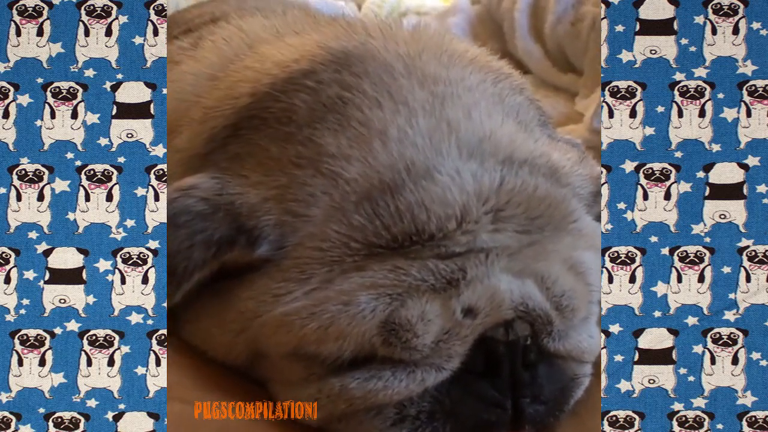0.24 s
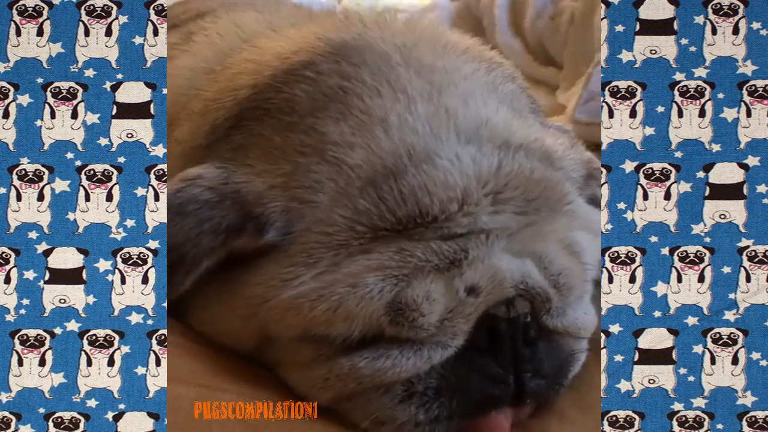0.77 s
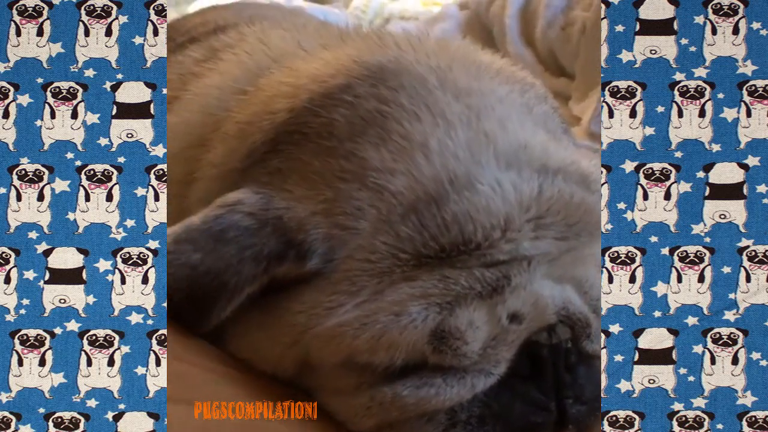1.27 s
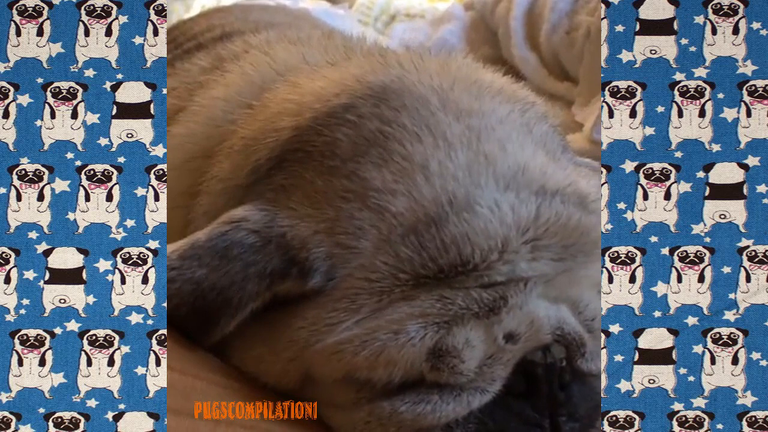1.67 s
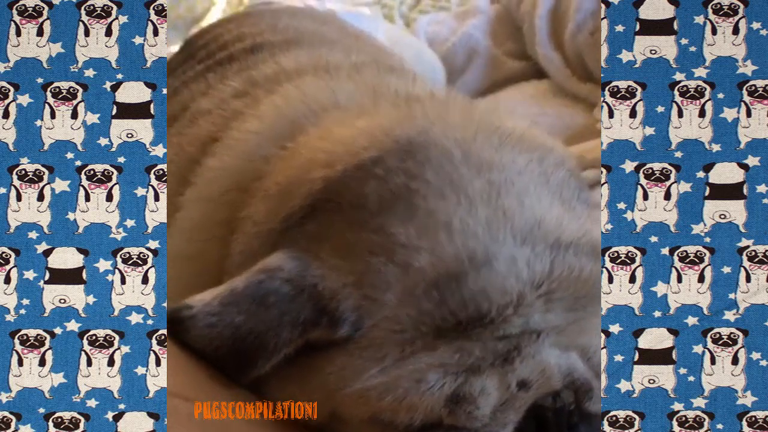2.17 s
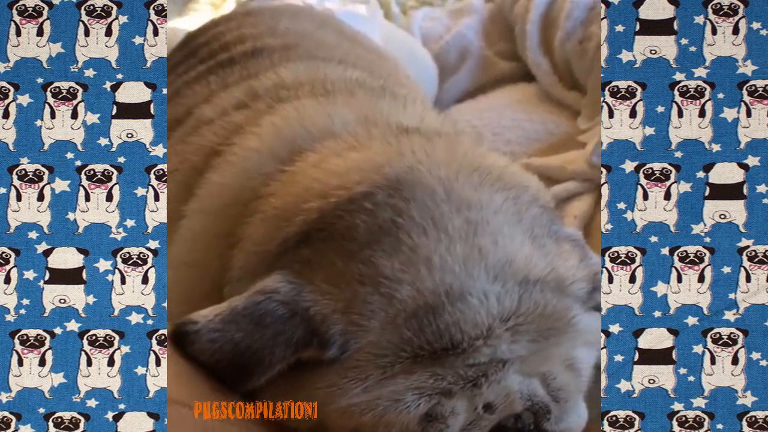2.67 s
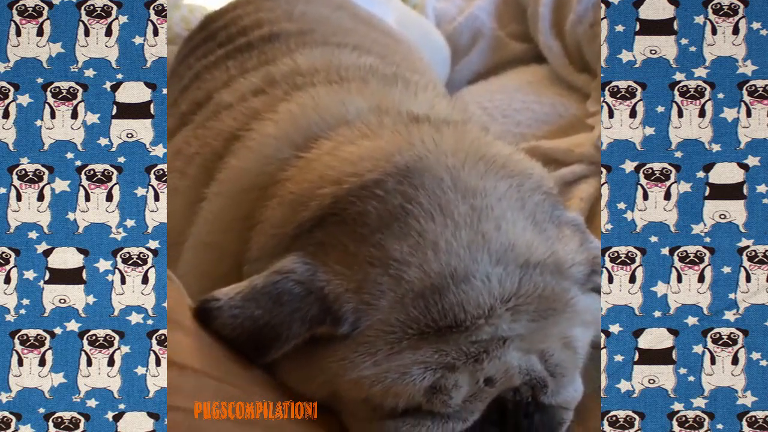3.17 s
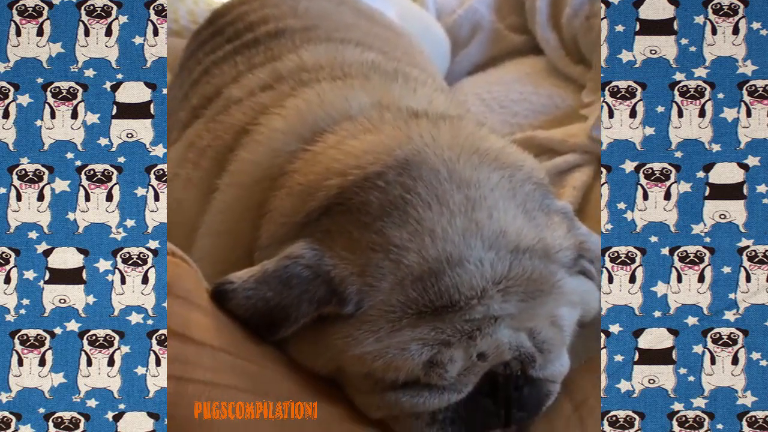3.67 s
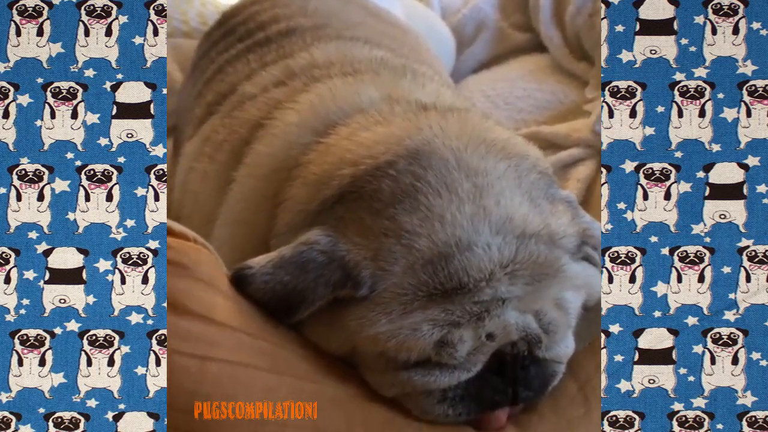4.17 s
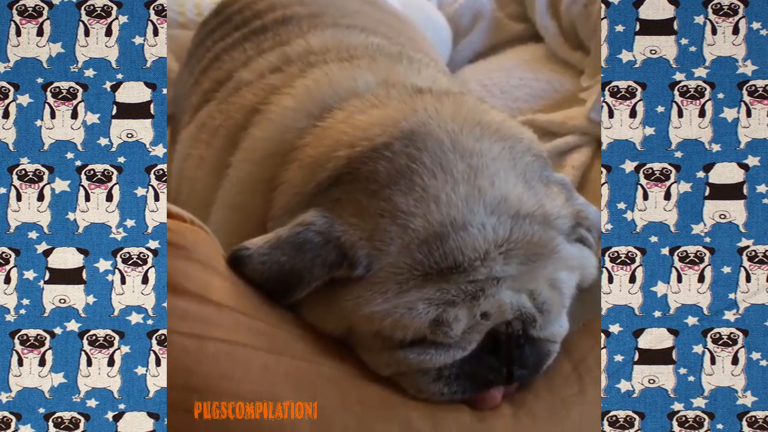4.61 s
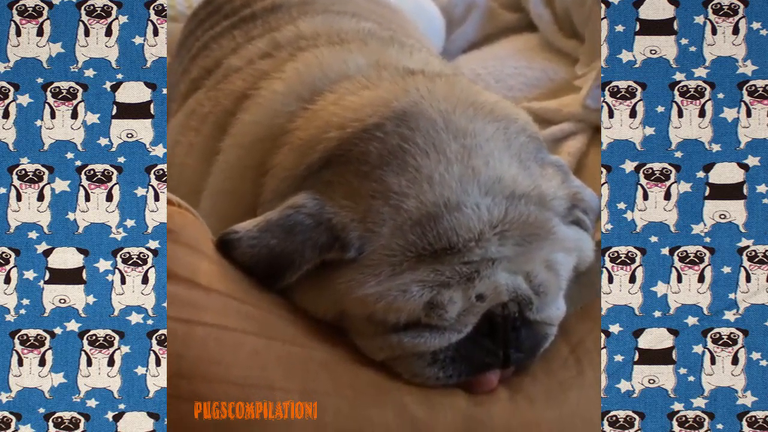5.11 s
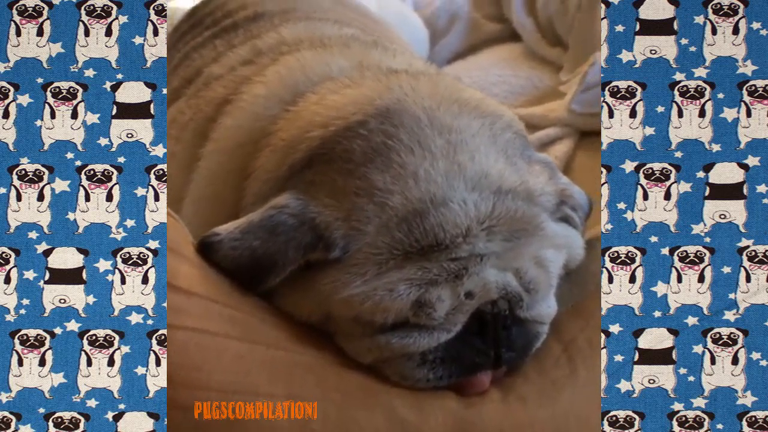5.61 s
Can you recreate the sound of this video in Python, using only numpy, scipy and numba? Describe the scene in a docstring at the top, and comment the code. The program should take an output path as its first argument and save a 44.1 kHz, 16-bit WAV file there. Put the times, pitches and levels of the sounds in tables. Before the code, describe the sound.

Indoors, a sleeping pug close to the microphone gives a tiny falling nose squeak, then one soft, raspy, airy breath lasting under two seconds. Meanwhile a heavy diesel vehicle approaches outside, its low drone, rumble and clatter swelling to a booming peak around three seconds with dull thuds and tyre hiss, then sinking slightly in pitch and receding. The low notes pulse in the room.

```python
"""Indoors, a pug sleeps close by and lets out one soft breath through its nose, starting with a tiny squeak.
Outside, most likely a six-cylinder diesel passes: its deep drone swells and eases off, sinking in pitch.
The engine is a stack of notes tied to its cycle; rumble, clatter and tyre hiss are noise given a spectrum.
The low notes boom and fade in the room's standing waves. The breath is noise rung through airway resonances."""
import sys
import numpy as np
from scipy import signal
from scipy.fft import rfft, irfft
from scipy.io import wavfile
from numba import njit

SR = 44100
rng = np.random.default_rng(int(sys.argv[2]) if len(sys.argv) > 2 else 0)


def persist_wave(psi):
    """Save psi, clipped to +-1, as 16-bit WAV."""
    counts = np.round(np.clip(psi, -1, 1) * 32767).astype(np.int16)
    wavfile.write(sys.argv[1], SR, np.atleast_2d(counts).T)


N = 257984
TIME = np.arange(N) / SR  # seconds


def undb(db):
    """Decibels to gain."""
    return 10 ** (np.asarray(db) / 20)


def unit(x):
    """Scale to an rms (average strength) of 1."""
    return x / np.sqrt(np.mean(x ** 2))


def curves(table):
    """Draw straight lines between the rows of a time table; one curve per column after the first."""
    time_s, *columns = np.transpose(table)
    return [np.interp(TIME, time_s, column) for column in columns]


def noise():
    """White noise."""
    return rng.standard_normal(N)


def walk(rate_hz):
    """Smooth random drift of spread 1, turning about rate_hz times a second."""
    hz = np.arange(N // 2 + 1) * SR / N
    smoothed = rfft(noise()) / (1 + (hz / rate_hz) ** 4)
    return unit(irfft(smoothed, N))


def colour(x, points):
    """Give x a spectrum drawn through (pitch_hz, level_db) points, falling away past both ends."""
    hz, db = np.transpose(points)
    log_hz = np.log(np.arange(1, N // 2 + 2) * SR / N)
    knots = np.log(hz)
    outside = np.abs(log_hz - np.clip(log_hz, knots[0], knots[-1]))
    shape_db = np.interp(log_hz, knots, db) - 40 * outside
    return unit(irfft(rfft(x) * undb(shape_db), N))


def resonate(x, modes):
    """Ring side-by-side resonances of (pitch_hz, width_hz, level_db)."""
    total = 0
    for k, (hz, width, db) in enumerate(modes):
        b, a = signal.iirpeak(hz, hz / width, fs=SR)
        # alternate signs
        total = total + (-1) ** k * undb(db) * signal.lfilter(b, a, x)
    return unit(total)


@njit
def band(x, hz, width):
    """Band-pass of gain 1 whose centre moves sample by sample."""
    y, b, low = np.empty(len(x)), 0., 0.
    for i in range(len(x)):
        g, k = np.tan(np.pi * hz[i] / SR), width / hz[i]
        v = (b + g * (x[i] - low)) / (1 + g * (g + k))
        b, low, y[i] = 2 * v - b, low + 2 * g * v, k * v
    return y


def swells(table):
    """Each row (middle_s, pitch_hz, half_length_s, peak_db) is a tone that swells and dies in a bell shape."""
    total = 0
    for middle_s, hz, half_s, db in table:
        since = TIME - middle_s
        bell = np.exp(-(since / half_s) ** 2)
        total = total + undb(db) * bell * np.sin(2 * np.pi * (hz * since + rng.random()))
    return total


SPEED_M_S, STREET_M, NEAREST_S = 10, 6, 3.15  # speed, nearest distance and when it is reached


def path(ahead_m=0):
    """Place along the street and distance from the house, in metres, of a point ahead of the vehicle's middle."""
    along = SPEED_M_S * (TIME - NEAREST_S) + ahead_m
    return along, np.hypot(along, STREET_M)


# When the rear turns towards the house, and the time scale of that turn.
REAR_S, TURN_S = 3.583, 0.034
# How each part of the vehicle carries, by part name:
# nearest_level_db (before the other changes), distance_falloff (1 = inverse), gain_from_behind_db
PART_LEVELS = { "octave": (-38, 1.1, -1.8), "firing": (-33, 0.84, 1.3), "front": (-44.5, 1.07, -6),
               "flank": (-43, 1.76, -30), "rear": (-57, 1.12, 15.55), "tail": (-60, 1.43, 14.4),
               "rumble": (-38.5, 0.94, -1.3), "exhaust": (-41.5, 0.5, -2.5),
               "clatter": (-41.5, 1.033, 1.12), "tyres": (-48, 1.44, -1.24), }
# Fades where a standing wave has a quiet spot on the listener; a negative depth is a swell at a loud spot.
# Columns: part name, middle_s, half_length_s, depth_db
STANDING_WAVE_DIPS = [("octave", 0.26, 0.7, 12), ("octave", 1.55, 0.21, 15), ("octave", 2.31, 0.09, 17),
                      ("octave", 3.143, 0.16, 14.2), ("octave", 4.57, 0.64, 25),
                      ("firing", 0.42, 0.74, 4.5), ("firing", 1.74, 0.18, 10), ("firing", 2.63, 0.41, 3.6),
                      ("firing", 2.99, 0.11, 21), ("firing", 3.33, 0.16, -2.6), ("firing", 1.25, .3, -2),
                      ("firing", 4.01, 0.43, 14.5), ("firing", 6.16, 0.68, 20), ("front", 3.12, 0.17, 5.2),
                      ("flank", 3.134, 0.28, 18), ("flank", 2.17, 0.16, 5.1), ("rear", 4.1, 0.13, 4.1),
                      ("rear", 4.6, 0.23, 4.1), ("rear", 5.35, 0.12, 12), ("rear", 5.82, 0.044, -6),
                      ("tail", 5.2, 0.45, 6), ("rumble", 0, 0.12, 12), ("rumble", 1.7, 0.3, 5.5),
                      ("rumble", 2.87, 0.12, 4.3), ("rumble", 5.2, .25, 2.5), ("rumble", 3.5, 0.042, 9.4),
                      ("rumble", 3.9, 0.35, 3.8), ("rumble", 3.4, 0.043, 6.7), ("exhaust", 0.14, 0.72, 1.4),
                      ("exhaust", 0.96, .3, -1.4), ("exhaust", 1.9, 0.32, 3.5),
                      ("exhaust", 4.48, 0.26, 4.3)]


def carried(part, ahead_m=0):
    """Gain of one part: it swells with nearness, shifts as the rear comes round and dips in standing waves."""
    nearest_db, falloff, behind_db = PART_LEVELS[part]
    behind = .5 + .5 * np.tanh((TIME - REAR_S) / TURN_S)
    dip_db = 0
    for name, middle_s, half_s, depth_db in STANDING_WAVE_DIPS:
        if name == part:
            dip_db = dip_db + depth_db * np.exp(-((TIME - middle_s) / half_s) ** 2)
    _, distance = path(ahead_m)
    return undb(nearest_db + behind_db * behind - dip_db) * (STREET_M / distance) ** falloff


SLIDE_S = 1.2  # time scale on which the wall echoes slide
# Early echoes from the walls: delay_s, shift_s (added late, taken off early), level_db
WALL_ECHOES = [(.0053, -.0006, -18), (.0091, .0009, -16)]


def room(x):
    """Wall echoes strengthen some pitches and weaken others, sliding as the vehicle's bearing turns."""
    bearing = np.tanh((TIME - NEAREST_S) / SLIDE_S)
    total = x
    for delay_s, shift_s, db in WALL_ECHOES:
        lag = np.rint((delay_s + shift_s * bearing) * SR).astype(int)
        total = total + undb(db) * x[np.maximum(np.arange(N) - lag, 0)]
    return unit(total)


# Tyre hiss spectrum: pitch_hz, level_db (per Hz, relative)
TYRE_SPECTRUM = [(1500, 9), (2600, -4.5), (3200, -10), (3800, -1), (4600, -5.5), (5800, -4.5), (7200, -9.5),
                 (8200, -10.5), (9500, -14), (12000, -14.5), (14000, -19.5)]
WHEELBASE_M = 4.6  # front axle to rear axle


def tyres(flutter_db=1.0):
    """Two axles hiss past one after the other, their strengths added as separate noises."""
    front = carried("tyres", WHEELBASE_M / 2)
    rear = carried("tyres", -WHEELBASE_M / 2)
    axles = np.hypot(front, rear) / np.sqrt(2)
    return axles * undb(flutter_db * walk(18)) * colour(room(noise()), TYRE_SPECTRUM)


# Dull thuds: middle_s, pitch_hz, half_length_s, peak_db
THUD_BURSTS = [(2.665, 68, .014, -32.5), (2.69, 234, 0.029, -34.5), (2.738, 74, .014, -29),
               (2.82, 68, .014, -31), (2.886, 72, 0.009, -23.5), (2.972, 52.4, .018, -28),
               (3.34, 109, 0.007, -24.5), (3.42, 195, 0.0073, -33), (3.43, 255, .02, -35),
               (3.5, 268, 0.02, -33.5)]


def thuds():
    """Short low bursts, perhaps the vehicle jolting over the road."""
    return swells(THUD_BURSTS)


CYLINDERS = 6  # each fires once per engine cycle
SOUND_M_S = 343
# Engine speed, nearly steady under the driver's foot: time_s, firings_per_second
ENGINE_SPEED = [(0, 85.5), (1.0, 85.6), (1.5, 86.35), (2.4, 86.9), (3.1, 86.6), (3.7, 85.55), (4.4, 86.0),
                (5.3, 87.2), (5.85, 85.9)]


def cycles():
    """Engine cycles heard so far; motion raises the pitch on the approach and lowers it on leaving."""
    along, distance = path()
    doppler = 1 - SPEED_M_S / SOUND_M_S * along / distance
    firing_hz = curves(ENGINE_SPEED)[0] * doppler
    return np.cumsum(firing_hz) / CYLINDERS / SR


# Rumble spectrum: pitch_hz, level_db (per Hz, relative)
RUMBLE_SPECTRUM = [(15, -24), (25, -16), (34, -12.5), (42, -3), (50, -7), (62, -2), (80, -8), (110, -6),
                   (150, -13.5)]


def rumble(cycle, puff_db=1.9, lope=0.37):
    """Low noise that puffs at random and lopes once each engine cycle."""
    beat = 1 + lope * np.cos(2 * np.pi * cycle)
    return carried("rumble") * undb(puff_db * walk(15)) * beat * colour(noise(), RUMBLE_SPECTRUM)


# Exhaust spectrum: pitch_hz, level_db (per Hz, relative)
EXHAUST_SPECTRUM = [(110, -13), (155, -7.5), (185, -4.5), (212, -2.5), (250, -2.5), (300, -8.5), (360, -14),
                    (480, -15)]


def exhaust(cycle, puff_db=1.5, lope=0.23):
    """Exhaust noise that puffs slowly at random and lopes once each engine cycle."""
    beat = 1 + lope * np.cos(2 * np.pi * cycle)
    return carried("exhaust") * undb(puff_db * walk(4.5)) * beat * colour(noise(), EXHAUST_SPECTRUM)


# The band that the road's echo cancels: time_s, pitch_hz, share_cancelled (0-1)
ROAD_HOLLOW = [(2.7, 520, 0.47), (3.3, 644, 0.43), (3.8, 790, 0.2), (4.7, 820, 0.54), (5.3, 805, 0.17)]


def hollow(x, width_hz=130):
    """The road's echo cancels part of a narrow band, which mostly climbs as the vehicle goes by."""
    hz, share = curves(ROAD_HOLLOW)
    return unit(x - np.clip(share, 0, 1) * band(x, hz, float(width_hz)))


# Clatter spectrum: pitch_hz, level_db (per Hz, relative)
CLATTER_SPECTRUM = [(250, -10), (340, -6), (430, -2.5), (520, -0.5), (620, 0.5), (760, -1), (960, -2.5),
                    (1170, -5.5), (1500, -9.5), (2000, -13), (2450, -14), (3100, -19.5), (5000, -30.5)]


def clatter(cycle, repeat=0.29, throb=0.025, flutter_db=0.77):
    """Valve and injector rattle: partly the same on every engine cycle, and stronger at each firing."""
    one_cycle = rng.standard_normal(int(N / cycle[-1]))
    repeated = one_cycle[(cycle % 1 * len(one_cycle)).astype(int)]
    firing = 1 + throb * np.cos(2 * np.pi * CYLINDERS * cycle)
    rattle = (noise() + repeat * repeated) * firing
    coloured = hollow(colour(room(rattle), CLATTER_SPECTRUM))
    return carried("clatter") * undb(flutter_db * walk(12)) * coloured


# Metal casing resonances: pitch_hz, width_hz, level_db (relative),
# facing_s (when its panel faces the house), half_length_s
CASING_PANELS = [(600, 50, -16, 3.65, .3), (862, 36, -2, 4.0, .45), (1010, 170, -4.5, 3.95, .4),
                 (1330, 220, -8, 4.0, .35), (1545, 26, 1.5, 4.25, .4), (1725, 28, 2, 3.85, .6),
                 (2150, 42, -4.5, 4.2, .4), (2335, 36, -3, 3.8, .22), (2735, 60, -12, 4.1, .4)]


def casing(casing_db=-57.5):
    """The engine's rattle rings its casing; each resonance stands out while its panel faces the house."""
    total = 0
    for hz, width, db, facing_s, half_s in CASING_PANELS:
        facing = 1 / (1 + ((TIME - facing_s) / half_s) ** 2)
        total = total + undb(db) * facing * band(noise(), np.full(N, float(hz)), float(width))
    return undb(casing_db) * unit(total)


# Intake and fan resonances: pitch_hz, width_hz, level_db (relative)
INTAKE_RESONANCES = [(422, 14, -1), (590, 93, -3), (888, 105, -1), (983, 92, 3.5), (1340, 236, -1.5),
                     (1680, 280, -6.5), (2300, 180, -8)]


def intake(roar_db=-3):
    """Air drawn in at the front roars, loudest before the rear turns to the house."""
    return carried("front") * undb(roar_db) * resonate(noise(), INTAKE_RESONANCES)


def notes(cycle, table, fading, fade_hz, dull_db=0):
    """Engine notes, each wavering on its own through shifting reflections."""
    out = 0
    for multiple, db in table:
        paths = 1 + fading * (walk(fade_hz) + 1j * walk(fade_hz))
        # dull_db is lost per octave above 28 times the cycle rate
        octaves = max(np.log2(multiple / 28), 0)
        tone = np.exp(2j * np.pi * (multiple * cycle + rng.random()))
        out = out + undb(db - dull_db * octaves) * np.real(paths * tone)
    # keep the average level the same however strong the wavering
    return out * np.sqrt(2 / (1 + 2 * fading ** 2))


# The five note groups share these columns: multiple (of the engine cycle rate), level_db (relative).
# Weaker notes heard best from the front.
FRONT_ORDERS = [(12, -5), (14, -4), (16, -3), (19, -10), (34, -17)]
# A whine of two notes, strongest as the engine approaches, dipping as it draws level.
FLANK_ORDERS = [(28, 0), (32, -3)]
# Notes heard best from behind.
REAR_ORDERS = [(12, -6), (15, -7), (18, -10), (20, -8), (26, -14), (28, -1), (30, 0)]
# A higher group from behind that dies away sooner.
TAIL_ORDERS = [(32, 0), (34, -6), (36, 1), (39, -11), (42, -11), (45, -6), (52, -13), (61, -9)]
# Notes of the tailpipe.
TAILPIPE_ORDERS = [(12, -5), (15, 1), (20, -19)]
# The late tailpipe hum: time_s, level_db (before the levels of its notes)
TAILPIPE_LEVEL = [(0, -70), (4.3, -60.5), (5.0, -52.5), (5.55, -48), (5.85, -65)]


def overtones(cycle):
    """Upper engine notes change as front, flank and rear are heard; the top rear note dulls on leaving."""
    dull_db = np.interp(TIME, [4.1, 5.3], [0, 22])
    front = carried("front") * notes(cycle, FRONT_ORDERS, fading=.6, fade_hz=8)
    flank = carried("flank") * notes(cycle, FLANK_ORDERS, fading=.5, fade_hz=7)
    rear = carried("rear") * notes(cycle, REAR_ORDERS, fading=.3, fade_hz=5, dull_db=dull_db)
    tail = carried("tail") * notes(cycle, TAIL_ORDERS, fading=.3, fade_hz=4)
    tailpipe = undb(curves(TAILPIPE_LEVEL)[0]) * notes(cycle, TAILPIPE_ORDERS, fading=.6, fade_hz=7)
    return front + flank + rear + tail + tailpipe


BOOM_ORDER = 9  # boom pitch as a multiple of the engine cycle rate
WAVER, BOOM_WAVER, WAVER_HZ = .25, .075, 12  # the boom is steadier than the other deep notes
# The boom as it swells and cancels in the room: time_s, level_db
BOOM_LEVEL = [(0.0, -64), (0.21, -48.5), (0.33, -43), (0.8, -49.5), (0.88, -39.5), (1.07, -40), (1.24, -57),
              (1.4, -38.5), (1.78, -40), (2.04, -38), (2.11, -47.5), (2.15, -37.5), (2.38, -26.5),
              (2.49, -30), (2.86, -22.5), (2.9, -20.5), (3.0, -21), (3.07, -26.5), (3.16, -24),
              (3.27, -43.5), (3.42, -26.5), (3.49, -24.5), (3.535, -29), (3.59, -26), (4.16, -37),
              (4.21, -30), (4.27, -35), (4.35, -31.5), (4.54, -38.5), (4.59, -33), (4.95, -32.5),
              (5.15, -45), (5.72, -39), (5.85, -43)]


def drone(cycle, shake=0.17):
    """Three deep notes that the room picks out, wavering in its reflections and shaken by uneven firing."""
    firing = carried("firing") * notes(cycle, [(CYLINDERS, 0)], WAVER, WAVER_HZ)
    octave = carried("octave") * notes(cycle, [(2 * BOOM_ORDER, 0)], WAVER, WAVER_HZ)
    boom = undb(curves(BOOM_LEVEL)[0]) * notes(cycle, [(BOOM_ORDER, 0)], BOOM_WAVER, WAVER_HZ)
    return (firing + octave + boom) * (1 + shake * walk(31))


def vehicle():
    """All the sounds of the passing vehicle, its engine parts sharing one cycle."""
    cycle = cycles()
    noises = tyres() + thuds() + rumble(cycle) + exhaust(cycle)
    engine = clatter(cycle) + casing() + intake() + overtones(cycle) + drone(cycle)
    return noises + engine


# Airway resonances: pitch_hz, width_hz, level_db (relative)
THROAT_RESONANCES = [(1010, 180, -2), (1336, 230, -2.5), (1810, 160, -7.5), (2440, 750, -17.5)]
# The palate lifts at the height of the breath: time_s, spread_share (how far the two lowest resonances
# draw apart), lift_db (moved from the lowest resonance to the others)
PALATE_MOVES = [(0, 0, 0), (.5, 0, -.5), (.83, -.05, .5), (.98, .11, 2), (1.1, .08, 1), (1.22, .02, -1.5),
                (1.35, .02, -2), (1.6, 0, -.5), (1.9, .02, 2)]


def throat():
    """Air rasps through the airway; its two lowest resonances shift and trade strength as the palate moves."""
    air = noise()
    spread, lift_db = curves(PALATE_MOVES)
    moves = [(1 - spread, -lift_db), (1 + spread, lift_db)]
    moves += [(np.ones(N), lift_db)] * (len(THROAT_RESONANCES) - 2)
    total = 0
    for k, ((hz, width, db), (ratio, gain_db)) in enumerate(zip(THROAT_RESONANCES, moves)):
        total = total + (-1) ** k * undb(db + gain_db) * band(air, hz * ratio, float(width))
    return unit(total)


# Soft catches of the palate: middle_s, pitch_hz, half_length_s, peak_db
PALATE_CATCHES = [(0.186, 578, 0.004, -47.5), (1.22, 1065, 0.0054, -42), (1.34, 1020, 0.016, -47.5),
                  (1.615, 1065, 0.003, -37.5)]


def catches():
    """The palate catches softly, each time as a very short swell of one resonance."""
    return swells(PALATE_CATCHES)


# The nose squeak: time_s, pitch_hz (before a small wobble), level_db
NOSE_SQUEAK = [(.075, 440, -70), (.092, 390, -48), (.11, 345, -46), (.13, 320, -52), (.16, 290, -62)]


def squeak():
    """Air briefly sets the narrow nostrils squeaking: a falling tone with a shaky pitch."""
    hz, level_db = curves(NOSE_SQUEAK)
    shaky_hz = hz * (1 + 0.027 * walk(57))
    tone = np.sqrt(2) * np.sin(2 * np.pi * np.cumsum(shaky_hz) / SR)
    sounding = (TIME > NOSE_SQUEAK[0][0]) * (TIME < NOSE_SQUEAK[-1][0])
    return undb(level_db) * tone * sounding


# The breath: time_s, throat_level_db (before flutter), nostril_ring_level_db, soft_hiss_level_db
BREATH_LEVELS = [(0, -69, -70.5, -77), (.3, -57, -72, -72), (.65, -52, -68.5, -65), (.95, -49.5, -77, -78),
                 (1.15, -50.5, -76, -64.5), (1.33, -51.5, -73, -60), (1.47, -50.5, -82, -68),
                 (1.62, -51, -86, -75), (1.9, -59, -100, -100)]
# Nostril resonances: pitch_hz, width_hz, level_db (relative)
NOSTRIL_RESONANCES = [(4150, 450, -2), (5500, 440, -3), (6550, 330, 0), (10030, 300, 0.5),
                      (13100, 650, -14)]
# Broad hiss, strongest late in the breath: pitch_hz, level_db (per Hz, relative)
HISS_SPECTRUM = [(2500, 6), (4000, 0), (5500, -1), (8000, -10), (10000, -7), (12000, -29)]


def breath(flutter_db=1.0):
    """Air rasps in the throat, then rings and hisses in the narrow nostrils."""
    throat_db, ring_db, hiss_db = curves(BREATH_LEVELS)
    rasp = undb(throat_db + flutter_db * walk(40)) * throat()
    ring = undb(ring_db) * resonate(noise(), NOSTRIL_RESONANCES)
    hiss = undb(hiss_db) * colour(noise(), HISS_SPECTRUM)
    return (rasp + ring + hiss) * (TIME < BREATH_LEVELS[-1][0])


def pug():
    """The sleeping dog: one breath, its squeak and the catches of its palate."""
    return breath() + squeak() + catches()


def scene():
    """The street beyond the window, and the sleeping dog close by."""
    return (vehicle() + pug())[None]


TOP_HZ = 14000


def record(dry):
    """Fade both ends over 3 milliseconds and steeply cut everything above the top pitch."""
    fade = np.minimum(np.minimum(TIME, TIME[::-1]) / .003, 1)
    top_cut = signal.ellip(10, .2, 80, TOP_HZ, fs=SR, output="sos")
    return signal.sosfilt(top_cut, dry * fade)


dry = scene()
out = record(dry)
persist_wave(out)
```